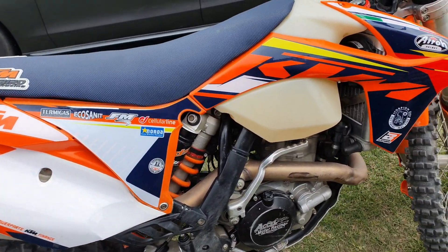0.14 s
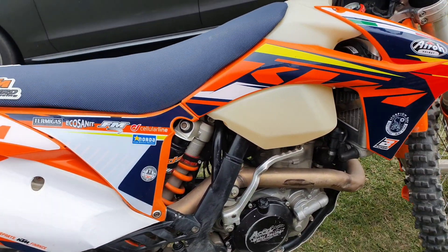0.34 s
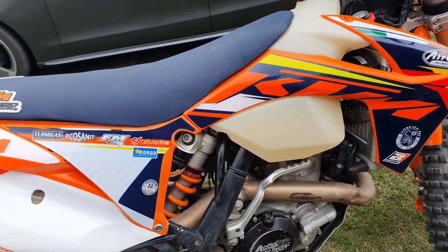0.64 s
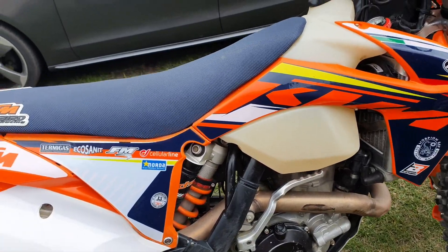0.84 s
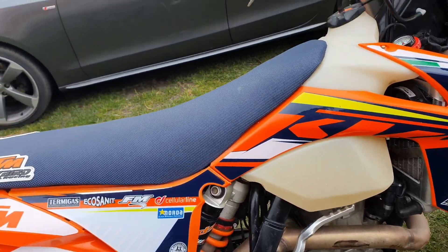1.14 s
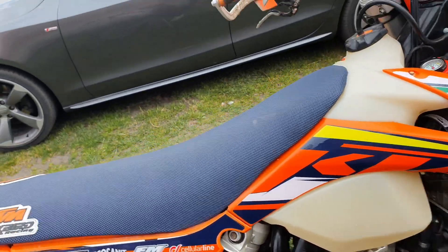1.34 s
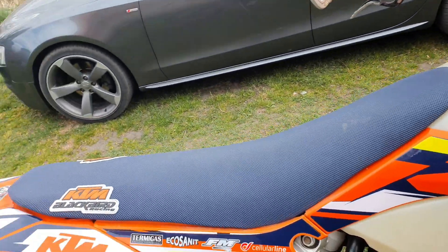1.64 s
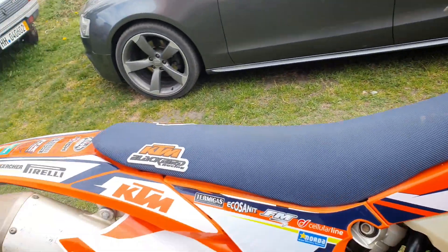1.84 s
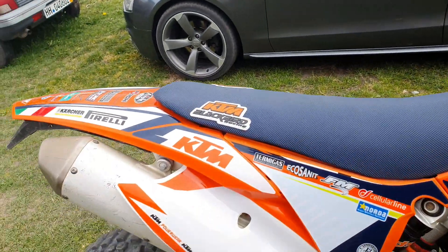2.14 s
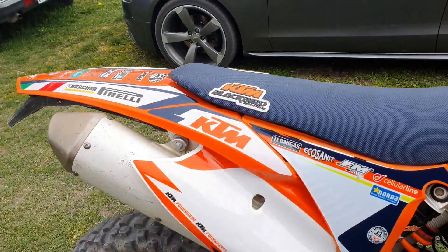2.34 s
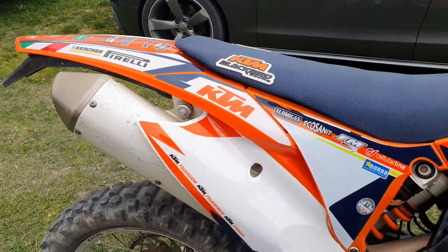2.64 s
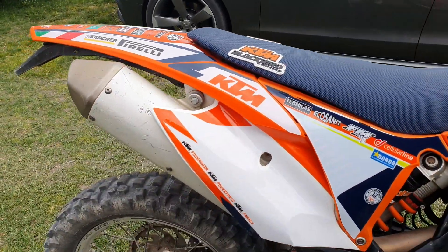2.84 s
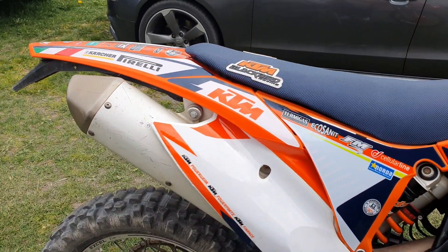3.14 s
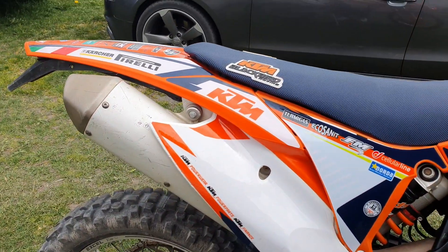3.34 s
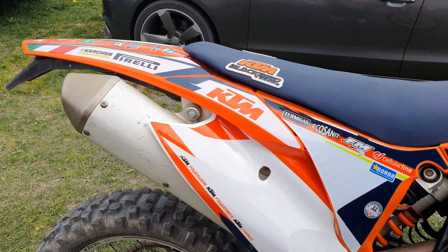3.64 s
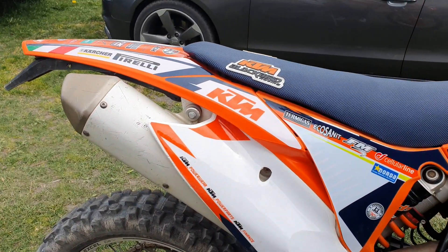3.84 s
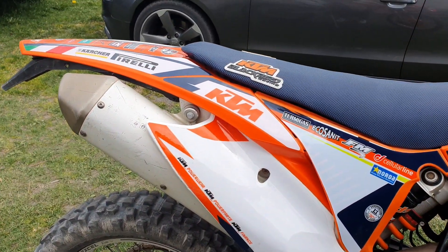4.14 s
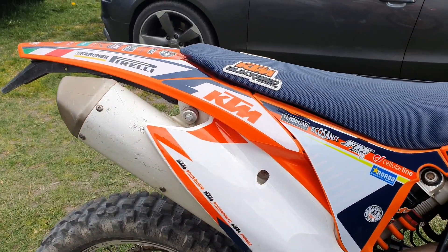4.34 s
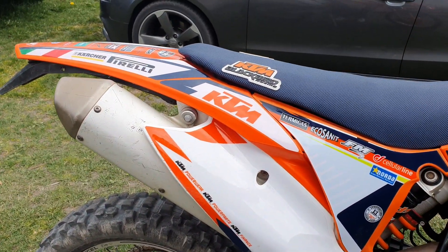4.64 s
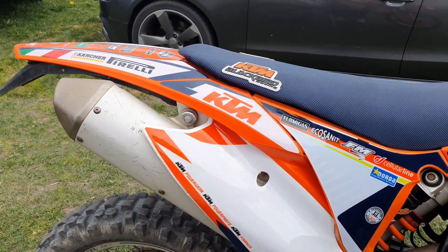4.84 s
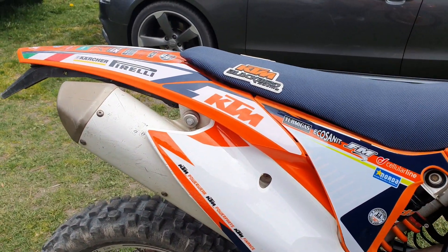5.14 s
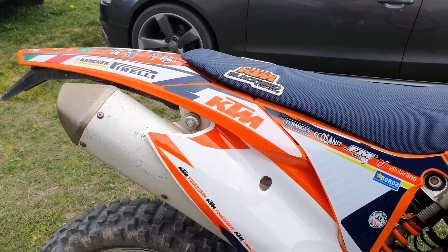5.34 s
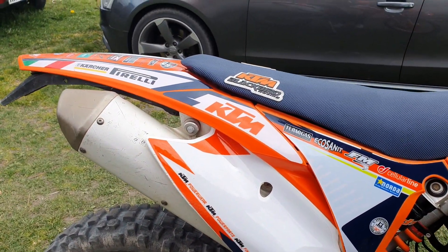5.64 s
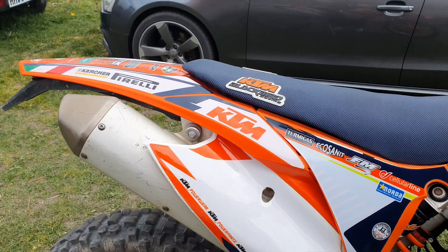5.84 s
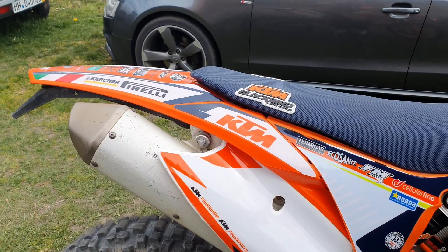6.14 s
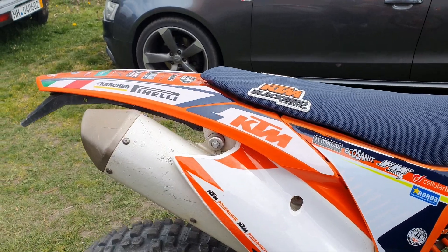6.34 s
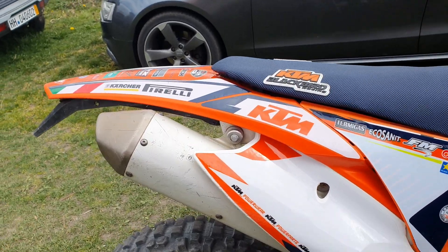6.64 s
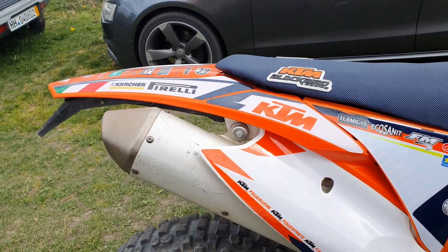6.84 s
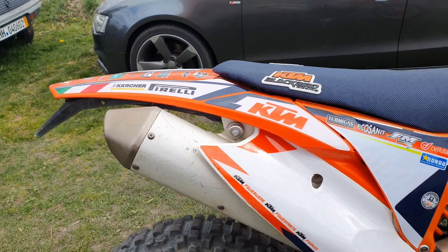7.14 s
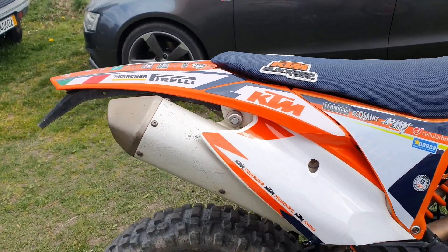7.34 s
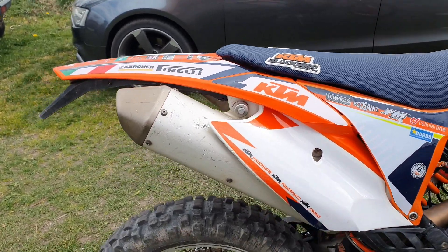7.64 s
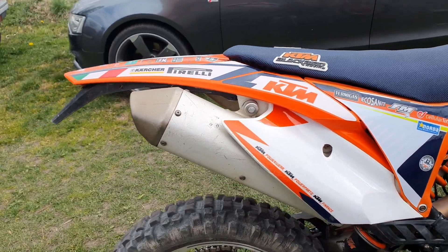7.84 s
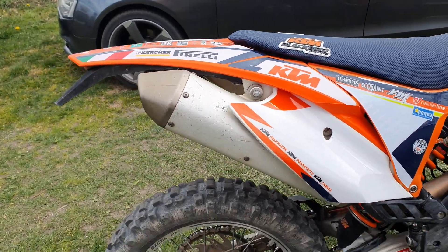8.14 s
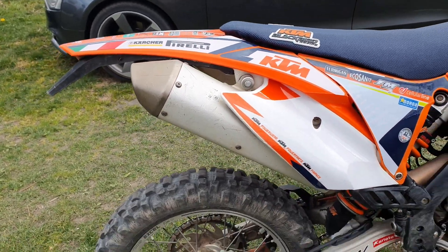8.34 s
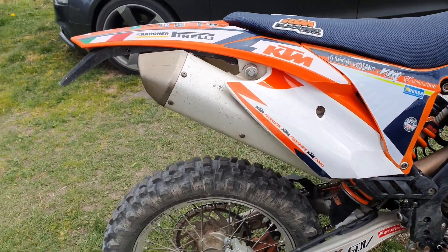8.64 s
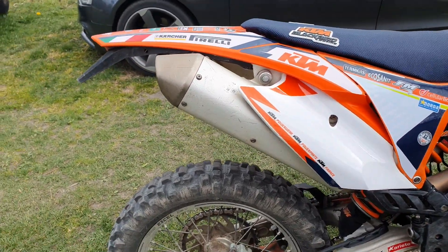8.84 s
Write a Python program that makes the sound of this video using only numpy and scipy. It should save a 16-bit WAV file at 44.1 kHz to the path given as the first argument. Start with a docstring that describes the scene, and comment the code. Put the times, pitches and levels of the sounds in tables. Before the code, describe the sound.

Quiet grassy outdoors with faint birds and wind bumps, then a short starter whine and a single-cylinder motorcycle catches, revs twice, settles to a thumping idle.

```python
"""Dirt bike starting on grass

A four-stroke single heard beside its silencer: the starter whines, the engine catches, is blipped twice and idles.
Each cycle: a knock rings the cases, gas puffs ring the exhaust pipe, noise rasps in the silencer, valves tick.
Behind it, shaped noise makes wind and grass; gliding near-sines make birds and a dove; a low hum lies below.
"""
import sys
import numpy as np
from scipy import signal
from scipy.fft import rfft, irfft, next_fast_len
from scipy.io import wavfile
from scipy.ndimage import uniform_filter1d

SR = 44100
rng = np.random.default_rng(int(sys.argv[2]) if len(sys.argv) > 2 else 0)


def to_wav(sig):
    """Store sig (one row per channel, or 1-D mono) as 16-bit WAV at the path in sys.argv[1].

    Samples outside -1..1 are clipped; the rate is SR.
    """
    pcm = np.clip(np.atleast_2d(sig), -1, 1) * 32767
    pcm = np.round(pcm).astype(np.int16)
    wavfile.write(sys.argv[1], SR, pcm.T)  # frames by channels


N = 396018
T = np.arange(N) / SR


def gain_of(db):
    """Decibels to an amplitude factor."""
    return 10 ** (np.asarray(db) / 20)


def evened(x):
    """Scales to rms 1."""
    return x / np.sqrt(np.mean(x ** 2) + 1e-20)


def read(points, hz):
    """Reads a table on a log-frequency axis."""
    f, value = np.transpose(points)
    return np.interp(np.log(hz + 1), np.log(f + 1), value)


def curves(rows, t=T):
    """The columns of a table, joined by straight lines in time."""
    s, *columns = np.transpose(rows)
    return [np.interp(t, s, c) for c in columns]


def noise():
    """White noise, rms 1."""
    return rng.standard_normal(N)


def colour(x, spectrum):
    """Minimum-phase filter with the given spectrum."""
    hz = abs(np.fft.fftfreq(4096, 1 / SR))
    log_gain = np.log(gain_of(read(spectrum, hz)))
    taps = np.fft.ifft(np.exp(np.conj(signal.hilbert(log_gain)))).real[:2048]
    return signal.oaconvolve(x, taps)[:len(x)]


def ring(x, modes):
    """Sum of two-pole resonances, each with its dB at the peak."""
    out = 0
    for hz, width_hz, db in modes:
        r = np.exp(-np.pi * width_hz / SR)
        poles = [1, -2 * r * np.cos(2 * np.pi * hz / SR), r * r]
        out = out + gain_of(db) * signal.lfilter([1 - r, 0, r - 1], poles, x)
    return out


def bursts(times, sizes, rise_s, fall_s):
    """Envelope: a quick rise and an exponential fall at each time."""
    train, t = np.zeros(N + SR), np.arange(4410) / SR
    np.add.at(train, (np.asarray(times) * SR).astype(int), sizes)
    shape = (1 - np.exp(-t / rise_s)) ** 2 * np.exp(-t / fall_s)
    return signal.oaconvolve(train, shape)[:N].clip(0)


def level(gate):
    """Keeps the beat of an envelope and evens out its slow level."""
    return gate / np.sqrt(uniform_filter1d(gate ** 2, size=5000) + 1e-9)


def drift(per_s):
    """Random values per_s times a second, joined by straight lines."""
    steps = rng.standard_normal(int(N / SR * per_s) + 2)
    return np.interp(T * per_s, np.arange(len(steps)), steps)


def swell(s, rise_s, fall_s):
    """A bell in time, height 1 at s, 1/e at rise_s before and fall_s after."""
    return np.exp(-((T - s) / np.where(T < s, rise_s, fall_s)) ** 2)


def plateau(start_s, length_s, edge_s):
    """Gate with straight edges inside its length."""
    return np.clip(np.minimum(T - start_s, start_s + length_s - T) / edge_s, 0, 1)


# Engine speed. Each row: time in seconds, firing strokes per second.
CRANK_SPEED = [(3.994, 24.0), (4.096, 12.95), (4.16, 11.65), (4.247, 28.78), (4.411, 28.7), (4.541, 21.8),
               (4.623, 25.39), (4.698, 22.86), (4.91, 30.8), (5.058, 29.01), (5.259, 19.78), (5.353, 20.22),
               (5.353, 15.2), (5.937, 13.08), (6.78, 13.6), (6.895, 12.26), (7.107, 13.95), (7.754, 13.22),
               (7.771, 13.8), (8.991, 13.87)]
# Throttle shut, nothing burns. Each row: start in seconds, end in seconds.
THROTTLE_SHUT = [(4.35, 4.54), (4.995, 5.32), (5.38, 5.5)]
START_PHASE_CYCLES = .122


def crank():
    """Integrates engine speed to the time of each exhaust stroke, and marks the strokes that burned."""
    speed_hz, = curves(CRANK_SPEED)
    cycles = np.cumsum(speed_hz * (T >= CRANK_SPEED[0][0])) / SR + START_PHASE_CYCLES
    fire_s = np.interp(np.arange(1, cycles[-1] + 1), cycles, T)
    rate_hz, = curves(CRANK_SPEED, fire_s)
    burns = ~np.any([(fire_s > a) & (fire_s < b) for a, b in THROTTLE_SHUT], axis=0)
    return speed_hz, fire_s, rate_hz, burns


# Air-column modes. Each row: frequency in Hz, width in Hz, level in dB.
PIPE_MODES = [(48, 15, -3.1), (92, 55, 13.3), (231, 91, 6.7)]


def pipe(puffs):
    """Puffs (s, width s, size) leave the tail pipe directly as flow change and ring its air column."""
    flow = np.zeros(N)
    for s, width_s, size in puffs:
        near = slice(int((s - .015) * SR), int((s + .015) * SR))
        flow[near] -= size * np.exp(-.5 * ((T[near] - s) / width_s) ** 2)
    return .00076 * SR * np.gradient(flow) + ring(flow, PIPE_MODES)


# Gas puffs of one stroke at idle, revved and unburnt. Each row: delay in ms, width in ms, relative size.
IDLE_PUFFS = [(0.28, 0.76, 0.71), (10.74, 1.31, 0.5), (16.59, 1.85, 0.41), (31.13, 3.78, 0.23)]
REV_PUFFS = [(0.15, 0.56, 0.61), (5.92, 0.53, 0.56), (9.51, 1.4, -0.11), (29.6, 0.99, 0.19)]
SHUT_PUFFS = [(-0.03, 0.6, 0.56), (-3.5, 1.7, -0.27), (14, 0.59, 0.077), (20.5, 1.3, 0.19)]
# Each row: time in seconds, relative exhaust level in dB, relative cases level in dB.
ENGINE_LEVELS = [(4.034, -18, -24), (4.095, -5.5, -30.5), (4.2, -3.5, -26), (4.33, -3.5, -24.5),
                 (4.37, -5.5, -27.5), (4.58, -10.5, -29), (4.9, -4.5, -26), (5.16, -9, -30.5),
                 (5.34, -11.5, -33.5), (5.47, -17.5, -36), (5.54, -12.5, -34), (6.24, -13.5, -36.5),
                 (6.68, -7, -33), (7.0, -7.5, -34.5), (7.75, -10, -40), (7.99, -13.5, -44), (8.21, -9, -36),
                 (8.48, -9, -29.5), (8.98, -10.3, -30.5)]
SHUT_PUSH_DB = 4.5  # unburnt strokes thump harder


def exhaust_thump(fire_s, rate_hz, burns):
    """Each stroke sends puffs of uneven size and timing into the pipe; they change shape with speed."""
    push_db = curves(ENGINE_LEVELS, fire_s)[0] + SHUT_PUSH_DB * ~burns
    chance = rng.standard_normal((len(fire_s), 9))
    puffs = []
    for s, per_s, burning, db, luck in zip(fire_s[:-1], rate_hz, burns, push_db, chance):
        revved = np.clip((per_s - 13.7) / 16.3, 0, 1)
        rows = np.array(SHUT_PUFFS)
        if burning:
            rows = IDLE_PUFFS + revved * np.subtract(REV_PUFFS, IDLE_PUFFS)
        size = gain_of(db + .8 + .5 * luck[0]) * rows[:, 2] * (1 + .12 * luck[1:5])
        delay_s = rows[:, 0] * (1 + 0.046 * luck[5:9]) / 1000
        puffs += zip(s + delay_s, rows[:, 1].clip(.4) / 1000, size)
    return pipe(puffs)


# Silencer shell, rung twice in series. Each row: frequency in Hz, width in Hz, level per pass in dB.
SILENCER_MODES = [(303, 255, 2), (489, 150, -4.5), (558, 154, -3), (792, 224, -1.5)]
# Throttle snaps open, silencer barks. Each row: time in seconds, boost in dB.
BLIPS = [(4.3, 12), (4.91, 7)]
BLIP_RISE_S, BLIP_FALL_S = 0.098, 0.045
RASP_DB, SHUT_RASP_DB = -17, -0.5  # relative to the mix of levels below; unburnt strokes rasp less
RASP_FROM_EXHAUST = 0.64  # share of the exhaust level, the rest from the cases


def silencer_rasp(fire_s, rate_hz, burns):
    """Jet noise pulses with the strokes through the silencer shell."""
    exhaust_db, cases_db = curves(ENGINE_LEVELS)
    rasp_db = RASP_DB + RASP_FROM_EXHAUST * exhaust_db + (1 - RASP_FROM_EXHAUST) * cases_db
    rasp_db += SHUT_RASP_DB * np.interp(T, fire_s, ~burns)
    rasp_db += sum(db * swell(s, BLIP_RISE_S, BLIP_FALL_S) for s, db in BLIPS)
    size = gain_of(2 * rng.standard_normal(len(fire_s))) * (.3 + .7 * burns) * rate_hz / 13.7
    jet = .2 + bursts(fire_s - .003, size, .002, .011)
    shell = evened(ring(ring(noise(), SILENCER_MODES), SILENCER_MODES))
    return gain_of(rasp_db) * shell * level(jet)


# Broad clatter. Each row: frequency in Hz, relative level in dB per Hz.
CLATTER_SPECTRUM = [(400, -34.5), (750, 0), (1200, 1.5), (1700, -3), (2400, -2), (3200, -4), (3900, -12),
                    (4700, -6), (5500, -15.5), (7000, -14), (7800, -32), (12000, -67)]
# Engine cases. Each row: frequency in Hz, width in Hz, level in dB.
CASE_MODES = [(1000, 250, -3), (1400, 140, -4), (2550, 60, -3), (3150, 130, -1), (3550, 100, -2),
              (4380, 110, -1), (4880, 140, 0), (6630, 200, -11)]
# Thin cover that rings at each knock. Each row: frequency in Hz, width in Hz, level in dB.
COVER_MODES = [(2700, 65, 0)]
# Each row: time in seconds, cover level relative to the rattle in dB.
COVER_LEVELS = [(4.2, -14), (6.2, -11), (6.45, 0), (7.1, -1), (7.6, -4), (8.1, -7), (8.4, -2), (8.98, -2)]


def case_knock(speed_hz, fire_s, rate_hz, burns):
    """Combustion blows rattle the cases and a cover: noise bursts through a clatter spectrum and modes."""
    luck = rng.standard_normal((3, len(fire_s)))
    burn_s = fire_s - 0.2347 / rate_hz  # the charge burns before the exhaust stroke
    size = 10.5 * gain_of(1.8 * luck[0]) * (.3 + .7 * burns) * (13.7 / rate_hz).clip(0, 1) ** 2
    knock = .26 + bursts(burn_s, size, .005, .0025)
    knock += bursts(burn_s, 0.15 * gain_of(3.6 * luck[1]), 0.003, 0.016)  # the cases rattle on
    knock += bursts(fire_s + 0.36 / rate_hz, 0.043 * gain_of(4.2 * luck[2]), 0.0039, 0.00057)
    beat = level(knock)
    cases_db = curves(ENGINE_LEVELS)[1]
    steady = noise()
    rattle = gain_of(cases_db + 0.5) * beat * steady * gain_of(2.44 * drift(500))
    ringing = np.clip(13.7 / speed_hz, 0, 1) ** 1.5  # at speed the many small blows blur the modes
    # each filter is scaled by its output for steady noise
    clatter = colour(rattle, CLATTER_SPECTRUM) / colour(steady, CLATTER_SPECTRUM).std()
    modes = ring(rattle, CASE_MODES) / ring(steady, CASE_MODES).std()
    cover = ring(rattle * np.sqrt(beat), COVER_MODES) / ring(steady, COVER_MODES).std()
    return 1.254 * clatter + 0.5 * ringing * modes + gain_of(curves(COVER_LEVELS)[0]) * cover


# Each row: frequency in Hz, relative level in dB per Hz.
TICK_SPECTRUM = [(6500, -30), (7600, -8), (8100, -14), (9000, -2), (9800, 0), (11000, -5), (12300, -5),
                 (13500, -16), (14800, -34)]
# Each row: delay after the exhaust stroke as a share of the cycle, relative level in dB.
VALVE_SEATS = [(.28, 3), (.585, 1), (.83, -3)]
TICKS_RE_CASES_DB = -20.5


def valve_ticks(fire_s, rate_hz):
    """Short bright noise bursts at fixed shares of each cycle."""
    seat = 0.04
    for share, db in VALVE_SEATS:
        size = gain_of(db + rng.standard_normal(len(fire_s)))
        seat = seat + bursts(fire_s + share / rate_hz, size, 0.0005, 0.0035)
    tick_db = curves(ENGINE_LEVELS)[1] + TICKS_RE_CASES_DB
    return gain_of(tick_db) * evened(colour(noise(), TICK_SPECTRUM)) * level(seat) * gain_of(3 * drift(150))


def engine():
    """Exhaust and metal sounds of one crank, returned apart."""
    speed_hz, fire_s, rate_hz, burns = crank()
    running = np.clip((T - 4.04) / .04, 0, 1)
    exhaust = exhaust_thump(fire_s, rate_hz, burns) + running * silencer_rasp(fire_s, rate_hz, burns)
    metal = case_knock(speed_hz, fire_s, rate_hz, burns) + valve_ticks(fire_s, rate_hz)
    return exhaust, running * metal


# Each row: time in seconds, gear whine in Hz, whine level in dB, relative grind level in dB.
STARTER_RUN = [(3.61, 2197, -46, -33), (3.658, 2650, -23, -27), (3.7, 2695, -19.5, -17),
               (3.785, 2370, -35, -22), (3.85, 2623, -18, -20.5), (3.89, 2860, -23.5, -20),
               (3.925, 3090, -12.5, -22.5), (3.952, 3110, -6.5, -20.5), (3.968, 2970, -28, -22.5),
               (4.008, 3140, -12, -18), (4.025, 3200, -36, -24), (4.045, 3450, -18.5, -27),
               (4.07, 2966, -27, -15.5), (4.09, 2944, -14, -35)]
# Each row: frequency in Hz, relative level in dB per Hz.
GRIND_SPECTRUM = [(120, -42), (200, -9.5), (277, -9), (442, -15), (558, -5), (800, -18.5), (892, -6.5),
                  (1800, -1.5), (2080, -8.5), (2530, 0), (10300, -24.5), (12800, -28.5), (14800, -43)]
# Starter clutch. Each row: time in seconds, relative level in dB.
CLUTCH_CLACKS = [(3.612, -21.5), (3.659, -11.5), (3.728, -8.5), (3.762, -5.5), (3.833, -7.5), (4.042, -7.5),
                 (4.075, -3.5), (4.16, -5), (4.214, -7)]
# Air pumped through the pipe. Each row: time in seconds, puff size in dB.
AIR_CHUFFS = [(3.673, -31), (3.714, -31), (3.823, -23), (3.846, -25), (3.869, -28), (3.89, -35)]
GEAR_PAIRS = [(1.42, -9), (1.2, -12), (1.62, -14), (2.42, -25)]  # ratio to the whine, dB re grind


def starter():
    """Wavering gear sines, grinding teeth as noise, clutch clacks, and air pumped through the pipe."""
    hz, whine_db, grind_db = curves(STARTER_RUN)
    first_s, last_s = STARTER_RUN[0][0], STARTER_RUN[-1][0]
    on = np.clip((T - first_s) / 0.0079, 0, 1) * np.clip((last_s - T) / 0.0074, 0, 1)
    turns = np.cumsum(hz * (1 + 0.0066 * drift(300))) / SR
    whine = np.sqrt(2) * gain_of(whine_db + 1.5 * drift(100)) * np.sin(2 * np.pi * turns)
    for ratio, db in GEAR_PAIRS:
        tone = np.sin(2 * np.pi * ratio * turns + 1.5 * drift(300))
        whine += gain_of(grind_db + db + 5 * drift(40)) * tone
    grind = gain_of(grind_db - 4 + 3 * drift(300)) * evened(colour(noise(), GRIND_SPECTRUM))
    s, db = np.transpose(CLUTCH_CLACKS)
    clack_gate = bursts(s, gain_of(db - 0.5), 0.00041, 0.0042)
    clacks = clack_gate * evened(colour(noise(), GRIND_SPECTRUM))
    return on * (whine + grind) + clacks + pipe([(s, .002, gain_of(db)) for s, db in AIR_CHUFFS])


# Likeness of the two ports. Each row: frequency in Hz, shared power from 0 to 1.
PORT_LIKENESS = [(60, .98), (300, 0.94), (800, 0.76), (1400, 0.66), (2100, .45), (2800, 0.66), (4500, 0.61),
                 (10000, 0.14)]
SHIFTS_PER_S = 4  # the hand-held microphone moves, so the reflections keep changing


def ports(x, left_lag_s):
    """Two ports hear the sound with a lag, mixed with changing reflections that differ between them."""
    size = next_fast_len(N + 8192)
    hz = np.fft.rfftfreq(size, 1 / SR)
    tails = rng.standard_normal((3, 2, 4096)) * np.exp(-np.arange(4096) / SR / .014)
    scatter = rfft(tails, size)
    scatter /= np.sqrt(np.mean(abs(scatter) ** 2))
    # three reflection patterns fade into each other
    turn = np.pi * (SHIFTS_PER_S * T + np.arange(3)[:, None]) / 3
    scattered = (rfft(x * np.cos(turn) * np.sqrt(2 / 3), size)[:, None] * scatter).sum(0)
    same = np.sqrt(read(PORT_LIKENESS, hz).clip(0, 1))
    lag = np.exp(-2j * np.pi * hz * np.array([[left_lag_s + 0.0004967], [.0005]]))
    both = (same * rfft(x, size) + np.sqrt(1 - same ** 2) * scattered) * lag
    return irfft(both, size)[:, :N]


# Each row: frequency in Hz, relative level in dB per Hz.
WIND_SPECTRUM = [(12, -15), (20, -1.5), (43, -1.5), (67, -0.5), (89, -9.5), (192, -24), (228, -23.5),
                 (600, -49.5), (780, -81), (1320, -120)]
# Steady wind level in dB at the left port, then at the right.
BREEZE_DB = [-60, -91]
# Gusts on the microphone. Each row: start in seconds, length in seconds, level in dB, left minus right in dB.
GUSTS = [(.25, 0.13, -68, 14), (0.476, 0.33, -74, 16), (0.902, .12, -56, 18), (1.04, .2, -42.5, 1),
         (1.271, .13, -38.5, 1), (1.442, 0.063, -38, -5), (1.6, 0.086, -70, 22), (1.86, 0.1, -68, 22),
         (2.476, 0.143, -40, -2), (2.691, 0.29, -51.5, -1), (2.99, .3, -66, -16), (3.353, 0.054, -58, -7),
         (3.47, 0.19, -59, -1)]


def wind(side, breeze_db):
    """Low noise on one port: a steady breeze plus gusts, flickering in level."""
    blow = gain_of(breeze_db)
    for start_s, length_s, db, pan_db in GUSTS:
        blow = blow + gain_of(db + side * pan_db) * plateau(start_s, length_s, edge_s=0.014)
    return blow * gain_of(1.8 * drift(24.96)) * evened(colour(noise(), WIND_SPECTRUM))


# Leaves, then near grass. Each row: frequency in Hz, relative level in dB per Hz.
LEAF_SPECTRUM = [(180, -19), (300, -2.5), (596, -2.5), (785, -0.5), (1230, 0), (2560, -6), (3320, -2),
                 (4370, -6), (6600, -11), (8000, -34), (10400, -54), (17600, -120)]
FIZZ_SPECTRUM = [(6500, -34), (8000, -11), (12500, -11), (14800, -3)]
# Grass stirred nearby. Each row: peak time in seconds, length in seconds, rustle in dB, fizz in dB.
RUSTLES = [(.8, 0.39, -78, -92), (1.327, 0.39, -64.5, -65), (1.657, 0.15, -67, -64),
           (1.976, 0.54, -70.5, -76), (2.33, 0.21, -67.5, -74), (2.617, 0.34, -66.5, -92),
           (2.92, 0.33, -73.5, -85), (3.095, .12, -68, -92), (3.33, 0.3, -76, -89), (3.582, 0.24, -70, -79)]
# Grass underfoot. Each row: time in seconds, relative level in dB.
SNAPS = [(1.079, -70), (1.385, -59), (1.639, -57), (2.279, -57), (2.539, -65)]
LEAVES_DB, GRASS_DB = -72, -100  # steady levels


def foliage():
    """Rustle and fizz for one port: two noise bands swell together, with short snaps in the leaf band."""
    rustle, fizz = gain_of(LEAVES_DB), gain_of(GRASS_DB)
    for s, length_s, rustle_db, fizz_db in RUSTLES:
        bell = swell(s, length_s / 2, length_s / 2)
        rustle = rustle + gain_of(rustle_db) * bell
        fizz = fizz + gain_of(fizz_db) * bell
    s, db = np.transpose(SNAPS)
    leaf_gate = rustle * gain_of(2.8 * drift(40)) + bursts(s, gain_of(db + 0.5), 0.0012, 0.0097)
    grass = fizz * gain_of(2.1 * drift(59.3)) * evened(colour(noise(), FIZZ_SPECTRUM))
    return grass + leaf_gate * evened(colour(noise(), LEAF_SPECTRUM))


COO_TREMBLE_HZ, COO_DEPTH = 12, .045  # depth as a share of the pitch
NOTE_PEAK, NOTE_START_DB, NOTE_END_DB = 0.39, -7, -11.5  # peak as a share of the length, ends re peak


def call(start_s, length_s, first_hz, middle_hz, last_hz, db, waver, tremble=0):
    """A gliding near-sine bird note that swells to its peak, then fades."""
    hz = np.interp(T, start_s + length_s * np.array([0, .5, 1]), [first_hz, middle_hz, last_hz])
    hz = hz * (1 + waver * drift(60) - tremble * np.cos(2 * np.pi * COO_TREMBLE_HZ * (T - start_s)))
    knots_s = start_s + length_s * np.array([0, NOTE_PEAK, 1])
    db = db + np.interp(T, knots_s, [NOTE_START_DB, 0, NOTE_END_DB])
    tone = np.sqrt(2) * np.sin(2 * np.pi * np.cumsum(hz) / SR)
    return plateau(start_s, length_s, edge_s=0.0019) * gain_of(db + 2.2 * drift(44)) * tone


# Coo notes. Each row: start in seconds, length in seconds, first, middle and last pitch in Hz, level in dB.
COOS = [(.45, .26, 505, 500, 465, -57), (.71, .14, 435, 400, 440, -71)]
# Purr modes. Each row: frequency in Hz, width in Hz, relative level in dB.
PURR_MODES = [(333, 49, -2), (450, 58, 5), (624, 42, -5)]
PURR_S, PURR_LENGTH_S, PURR_DB, PURR_HZ = 0.29, 0.34, -71.5, 28


def dove():
    """A rough purr of throbbing, resonant noise, then a trembling coo."""
    throb = 1 + np.cos(2 * np.pi * PURR_HZ * T)
    purr = evened(ring(throb * noise(), PURR_MODES)) * swell(PURR_S, PURR_LENGTH_S / 2, PURR_LENGTH_S / 2)
    coo = sum(call(*row, 0.04, COO_DEPTH) * gain_of(4 * drift(60)) for row in COOS)
    return gain_of(PURR_DB) * purr + coo


# Each row: start in seconds, length in seconds, first, middle and last pitch in Hz, level in dB.
BIRD_NOTES = [(.1, 0.22, 6300, 7400, 6240, -76), (.455, 0.074, 1680, 1770, 1720, -70),
              (.46, .035, 870, 875, 870, -73), (.94, 0.053, 4630, 4170, 3560, -65),
              (2.01, .04, 4050, 3490, 3200, -61), (2.07, .03, 3400, 2920, 2640, -62),
              (2.565, .035, 3940, 4380, 4220, -58), (2.73, .02, 3200, 3860, 4600, -58.5),
              (2.79, 0.24, 4750, 4190, 4050, -65.5), (3.082, .16, 2660, 2980, 2940, -61.5),
              (3.11, .04, 4170, 4980, 4160, -61), (3.43, .09, 6850, 7260, 6400, -67.5),
              (3.53, 0.078, 3620, 4200, 3730, -61.5)]


def birds():
    """Gliding bird notes with a slightly wavering pitch; the 870 Hz row is a lower partial of the 1770 Hz note."""
    return sum(call(*row, 0.013) for row in BIRD_NOTES)


CHIRPS, CHIRPS_PER_S, FAINTEST_CHIRP_DB = 160, 30, -80


def distant_birds():
    """A faint chatter of short glides at random moments and pitches in the first 5.3 s."""
    out = np.zeros(N)
    for when, pitch, glide, length, loud in rng.random((CHIRPS, 5)):
        s, hz = when * CHIRPS / CHIRPS_PER_S, 3200 + 1500 * pitch
        t = np.arange(int((0.0135 + 0.041 * length) * SR)) / SR
        glide_hz = 3000 * (glide - .6) * (t / t[-1] - .5)
        note = np.hanning(len(t)) * np.sin(2 * np.pi * np.cumsum(hz + glide_hz) / SR)
        part = out[int(s * SR):][:len(t)]
        part += gain_of(FAINTEST_CHIRP_DB + 9 * loud) * note[:len(part)]
    return out


def echoes(x):
    """Trees and walls smear far sounds: a decaying noise tail, different at each port."""
    t = np.arange(8820) / SR
    tail = rng.standard_normal((2, len(t))) * np.exp(-t / 0.035)
    return x + 1.1 * signal.oaconvolve(x[None], tail / np.linalg.norm(tail[0]), axes=1)[:, :N]


def far_hum():
    """A low far-off hum: noise passed twice through one narrow resonance."""
    mode = [(42.6, 3, 0)]  # Hz, width Hz per pass, dB
    return gain_of(-66) * evened(ring(ring(noise(), mode), mode))


def garden():
    """Wind and foliage drawn separately for each port, a shared hum, and echoing birds."""
    near = np.array([wind(side, db) + foliage() for side, db in zip((.5, -.5), BREEZE_DB)])
    return near + far_hum() + echoes(dove() + birds() + distant_birds())


# The microphone turns a little. Each row: time in seconds, left minus right in dB.
ENGINE_PAN = [(3.6, -1.5), (7.0, -1), (7.4, 4), (8.05, 4.5), (8.3, -2.5), (8.98, -3)]
ENGINE_LAG_S, EXHAUST_LAG_S = .00024, -.00018  # nominal lag of the left port behind the right


def scene():
    """The bike in the garden: tail pipe to the left, engine to the right."""
    exhaust, metal = engine()
    pan_db, = curves(ENGINE_PAN)
    pan = gain_of(pan_db * [[.5], [-.5]])
    return ports(exhaust, EXHAUST_LAG_S) + ports(metal + starter(), ENGINE_LAG_S) * pan + garden()


MIC_LOW_HZ, EDGE_HZ = 30, 14900


def record(dry):
    """The microphone's bass roll-off and the upper band limit."""
    thin = signal.sosfilt(signal.butter(2, MIC_LOW_HZ, "highpass", fs=SR, output="sos"), dry)
    taps = signal.firwin(511, EDGE_HZ, window=("kaiser", 9), fs=SR)
    return signal.oaconvolve(thin, taps[None], "same").clip(-1, 1)


dry = scene()
out = record(dry)
to_wav(out)
```